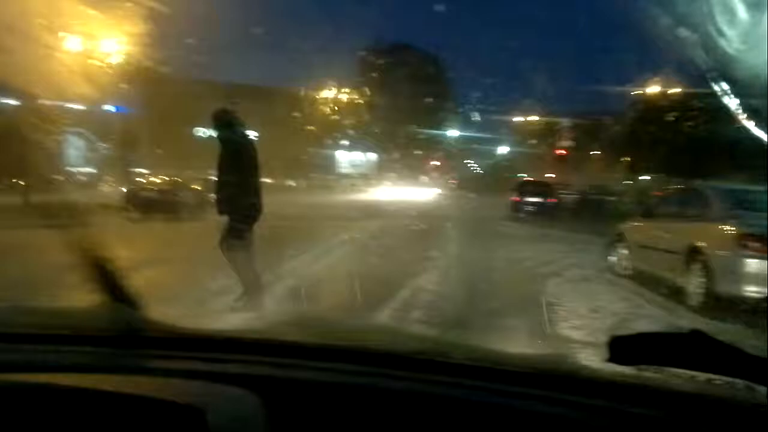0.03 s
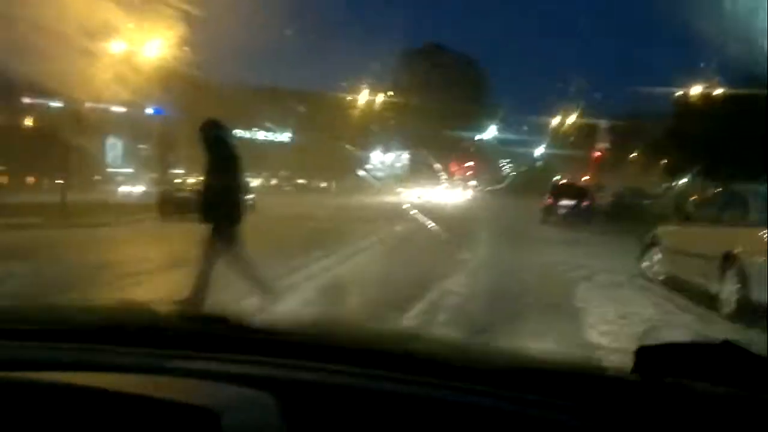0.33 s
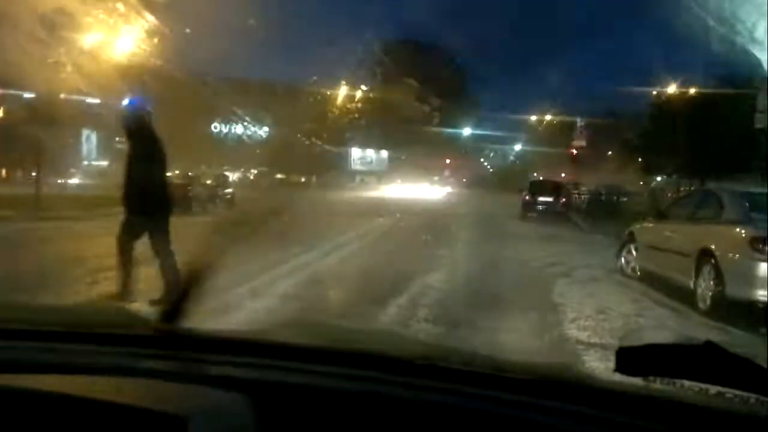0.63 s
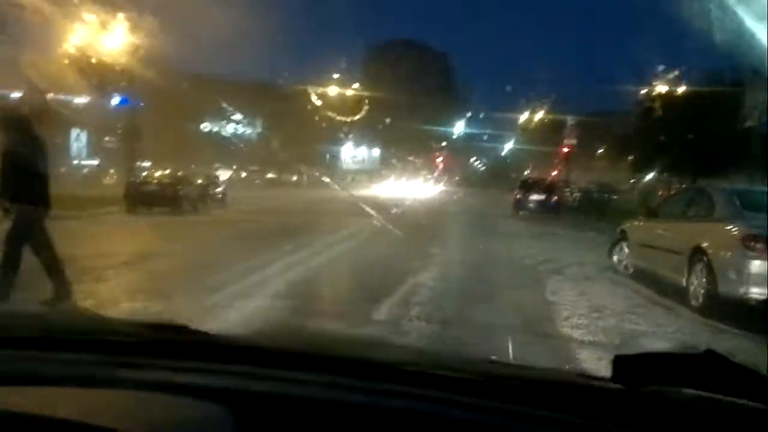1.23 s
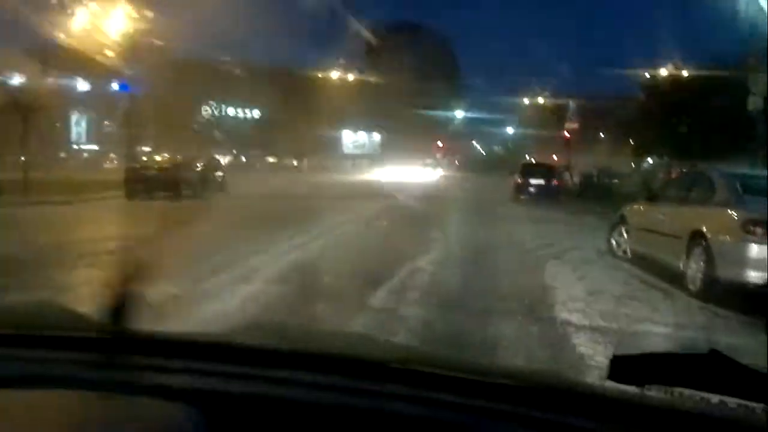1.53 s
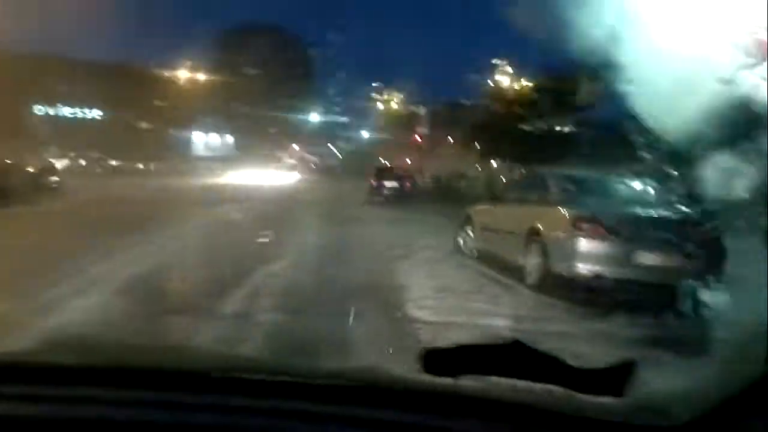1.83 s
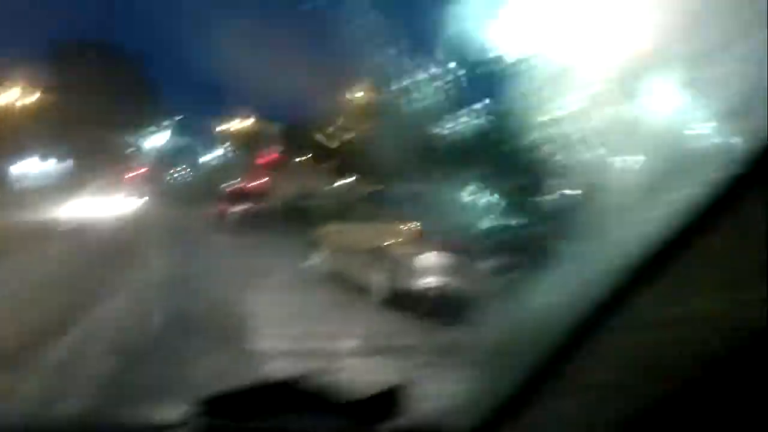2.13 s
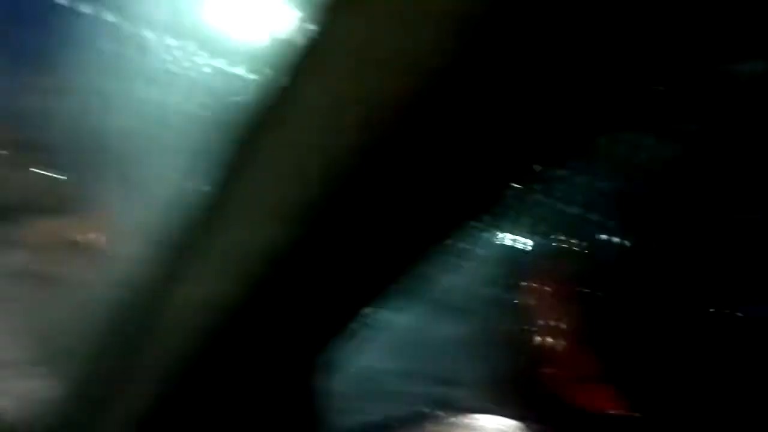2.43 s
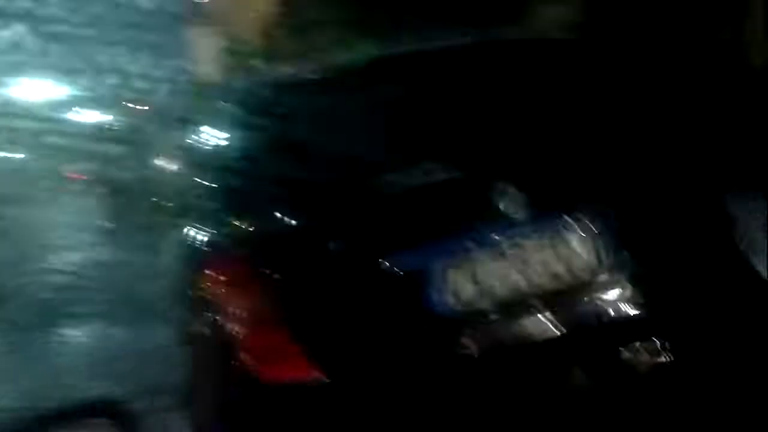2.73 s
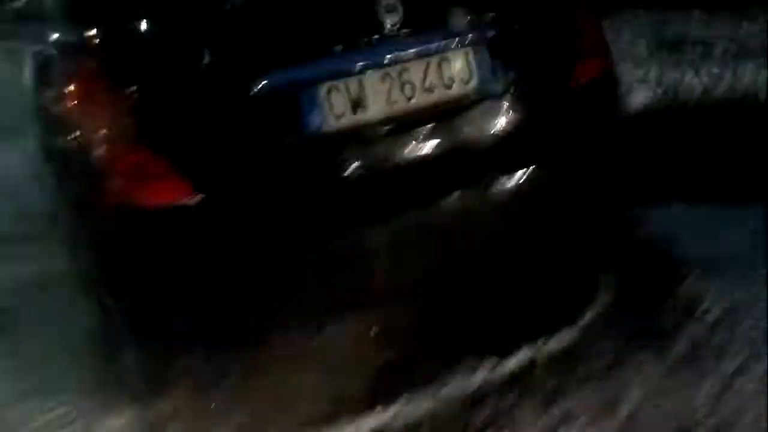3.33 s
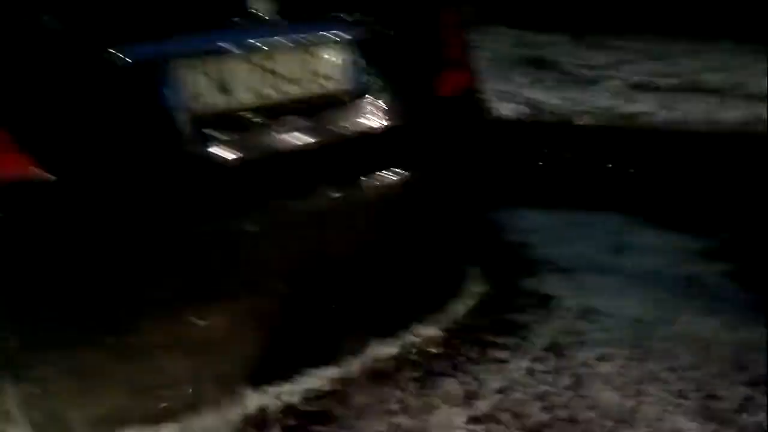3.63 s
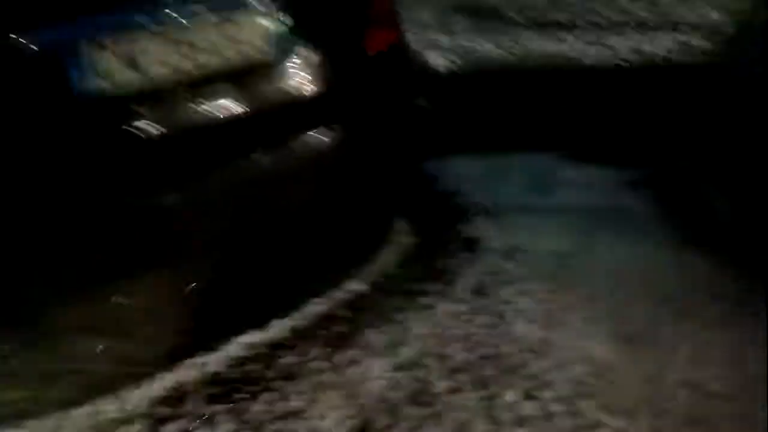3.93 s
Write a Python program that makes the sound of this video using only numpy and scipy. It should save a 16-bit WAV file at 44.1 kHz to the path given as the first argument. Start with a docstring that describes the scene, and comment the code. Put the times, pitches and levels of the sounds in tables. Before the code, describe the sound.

Hail drums on a car roof and cracks on the glass, heard from inside.

```python
"""In the front seat of a car, with hail coming down while the engine idles.
Countless small stones drum on the lined roof and patter on the windows, over a wash of street noise.
Big ones thud on the sheet metal or crack on the glass. The wipers thump at the end of their sweep.
The tone shifts as the listener turns to the side window, and a limiter ducks after the hardest blows."""
import sys
import numpy as np
from scipy import signal
from scipy.fft import rfft, irfft
from scipy.io import wavfile
from scipy.ndimage import uniform_filter1d

SR = 44100
rng = np.random.default_rng(int(sys.argv[2]) if len(sys.argv) > 2 else 0)


def wav_out(sig):
    """Save sig, one row per channel (or a flat mono array), as 16-bit PCM at SR to the path in sys.argv[1]."""
    wavfile.write(sys.argv[1], SR, np.round(np.clip(np.atleast_2d(sig).T, -1, 1) * 32767).astype(np.int16))


N = 176400  # 4 seconds
BLOW_SAMPLES = 12000

# Big stones on the roof: start_s, level_db, hardness_db (more means an icier crack)
ROOF_HITS = [(0.288, -1, -24), (0.355, -7.5, -7), (0.473, -11.5, -1), (0.589, -13.5, -1),
             (0.674, -20.5, 5.5), (0.982, -9.5, -24), (1.016, -7.5, -52), (1.117, -8.5, -27.5),
             (1.136, -19.5, 4.5), (1.315, -11.5, -41), (1.648, -8.5, -24), (1.706, -9.5, -9.5),
             (1.929, -9.5, -2.5), (2.229, -9.5, -13), (2.322, -7.5, -69), (2.606, -20, 3),
             (2.704, -9.5, -50), (2.77, -14.5, -3.5), (2.858, -8.5, -9), (3.04, -9, -48), (3.084, -13, -14),
             (3.358, -9.5, -3.5), (3.38, -6.5, -47), (3.595, -11.5, -40), (3.724, -12, -3.5),
             (3.942, -8.5, -59), (3.987, -14.5, -0.5)]
# Big stones on the glass, and at 2.12 s a soft knock with a small tick: start_s, level_db, sharpness_db,
# pitch_hz
GLASS_HITS = [(0.386,-3,-15,3400), (.4661,-1.5,-11.5,3030), (1.0136,-12.5,-15,3380), (1.0489,0,-20,3010),
              (1.138,-14,-9,5700), (1.8284,-10,-24,2990), (1.8747,-15,-13,3800), (1.964,-2.5,-21,3200),
              (2.12,-12.5,-25,3220), (2.1872,-1.5,-12.5,3400), (2.3025,-12.5,-35,3200),
              (2.4887,-8,-21,3300), (2.575,-11,-30,3270), (2.9145,-13,-16,2750), (3.0825,-15,-6,3260),
              (3.2483,-11,-22,3270), (3.3265,-11,-20,3000), (3.5353,-9,-27,3620), (3.7557,-11,-8,3740),
              (3.924,-14,-12,3370)]
# Wiper thumps: start_s, level_db, pitch_hz
WIPER_THUMPS = [(0.861, -12.5, 65.6), (1.019, -6, 154)]
# Engine tones and cabin booms: pitch_hz, level_db, wander (0 to 1)
ENGINE_TONES = [(25.8, -29, 0), (61.33, -29.5, 0.34), (108.6, -27, 0.59)]

# How strong each sound is from bass to treble: frequency_hz, level_db
ROOF_SPECTRUM = [(40, -31), (110, 0), (190, 0.5), (400, -3.5), (800, -10.5), (1700, -17), (2500, -17.5),
                 (3500, -18), (16000, -67)]
KNOCK_SPECTRUM = [(200, 0.5), (700, -0.5), (2300, -9.5), (3600, -15.5), (12000, -48)]
ICE_SPECTRUM = [(800, -43), (2000, 2), (3500, 7.5), (4900, -2), (6300, 1), (8300, -18), (10000, -10),
                (16000, -41)]
GLASS_SPECTRUM = [(900, -19), (2200, -8.5), (2750, -4.5), (3250, 3.5), (3800, -3.5), (6300, -21),
                  (8300, -34.5), (16000, -63)]
CONTACT_SPECTRUM = [(1500, -24), (3200, 4.5), (6800, -3), (16000, -36)]
PATTER_SPECTRUM = [(900, -4), (2400, -10), (3500, -0.5), (4900, -12), (6500, -13.5), (16000, -45.5)]
STREET_SPECTRUM = [(20, 8), (65, 0), (134, 7), (234, -6), (485, -15.5), (1000, -16.5), (2400, -21.5),
                   (3500, -29.5), (6200, -29.5), (8400, -44.5), (16000, -51)]
# How long the roof takes to fade by 60 dB: frequency_hz, ring_s
ROOF_RING_TIMES = [(120, 0.35), (600, 0.3), (3000, 0.13)]
# Pitches the roof favours: pitch_hz, boost_db
ROOF_RESONANCES = [(285, 4.5), (500, 3)]

# How alike left and right sound: frequency_hz, likeness (0 to 1)
STEREO_LIKENESS = [(100, 1), (600, 0.94), (1400, 0.53), (3000, 0.36)]
# Which side is louder: frequency_hz, left_minus_right_db
STEREO_BALANCE = [(150, -6.5), (400, -5.5), (800, -3.5), (1400, -2), (3000, -10.5), (5500, 0), (9000, -9)]
# How far the left wave runs ahead of the right: frequency_hz, lead_radians
STEREO_LEAD = [(950, 0), (2300, -2.5), (3600, -6.5), (6000, -1.5)]
# The glass moves to the right as the listener turns: time_s, left_minus_right_db
GLASS_POSITION = [(.4, 9), (3.5, -3)]
# Roughly where the midrange dips beside the side window: time_s, frequency_hz
WINDOW_DIP = [(2.42, 770), (2.95, 1356)]


def roof_drumming(level_db=-20.5):
    """Small stones drum on the roof, each making it ring."""
    return amp(level_db) * shower(ROOF_SPECTRUM, ROOF_RING_TIMES, rise_s=0.00018,
                                  per_s=260, spread_db=2.5, spots=28)


def roof_thuds(thud_db=-6, knock_db=-4, ice_db=-5, knock_share=0.22, bounce_db=-6):
    """A big stone makes the sheet metal boom, knocks and cracks on it, then lands a second time."""
    out = np.zeros((2, N))
    for start_s, level_db, hardness_db in ROOF_HITS:
        boom = panel_blow(ROOF_SPECTRUM, ROOF_RING_TIMES, rise_s=0.0062)
        add(out, start_s, amp(level_db + thud_db) * boom)
        bounce_s = 0.012 * (1 + rng.random())
        for delay_s, drop_db in [(0, 0), (bounce_s, bounce_db)]:
            knock = panel_blow(KNOCK_SPECTRUM, ring_s=0.093, rise_s=0.00032)
            knock *= amp(knock_db + knock_share * hardness_db)
            ice = amp(ice_db + hardness_db) * panel_blow(ICE_SPECTRUM, ring_s=0.055, rise_s=0.001)
            add(out, start_s + delay_s, amp(level_db + drop_db) * (knock + ice))
    return out


def roof(narrowness=24):
    """Every blow on the roof is boosted at the same few pitches."""
    blows = roof_drumming() + roof_thuds()
    return blows + sum((amp(db) - 1) * signal.lfilter(*signal.iirpeak(hz, narrowness, fs=SR), blows)
                       for hz, db in ROOF_RESONANCES)


def glass_cracks(ring_db=-4, contact_db=-2, spray_db=1, contact_s=0.00021, spectrum_peak_hz=3250):
    """A sharp contact, a brief ring whose pitch depends on the spot struck, and a thin spray of ice."""
    out, t = np.zeros((2, N)), np.arange(BLOW_SAMPLES) / SR
    for start_s, level_db, sharpness_db, pitch_hz in GLASS_HITS:
        spot_spectrum = np.array(GLASS_SPECTRUM) * [pitch_hz / spectrum_peak_hz, 1]
        ring = amp(ring_db) * panel_blow(spot_spectrum, ring_s=0.034, rise_s=0.00061)
        noise = irfft(cabin_noise_spectrum(CONTACT_SPECTRUM, BLOW_SAMPLES))
        contact = amp(contact_db) * unit_peak(noise * np.exp(-t / contact_s))
        spray = amp(spray_db) * panel_blow(CONTACT_SPECTRUM, ring_s=0.05, rise_s=0.001)
        crack = ring + amp(sharpness_db) * (contact + spray)
        side_db = np.interp(start_s, *np.transpose(GLASS_POSITION))
        add(out, start_s, amp(level_db) * pan(side_db) * crack)
    return out


def window_patter(level_db=-32, flurry_db=2.5):
    """Small stones tick on the windows, louder and softer in quick flurries."""
    ticks = shower(PATTER_SPECTRUM, ring_s=0.05, rise_s=0.00012, per_s=250, spread_db=5.9, spots=24)
    flurries = unit_level(amp(flurry_db * drift(rate_hz=10)))
    return amp(level_db) * ticks * flurries


def wipers(rise_s=0.021):
    """Soft low thumps as the blades turn round."""
    out, t = np.zeros((2, N)), np.arange(BLOW_SAMPLES) / SR
    swell = (t / rise_s * np.exp(1 - t / rise_s)) ** 2
    for start_s, level_db, pitch_hz in WIPER_THUMPS:
        add(out, start_s, pan(-6.5) * amp(level_db) * swell * np.sin(2 * np.pi * pitch_hz * t))
    return out


def engine():
    """The steady firing tone of the idling engine and the wavering booms of the cabin."""
    t, hum = np.arange(N) / SR, 0
    for pitch_hz, level_db, wander in ENGINE_TONES:
        waver = 1 - wander + wander * (drift(rate_hz=10) + 1j * drift(rate_hz=1))
        tone = (waver * np.exp(2j * np.pi * pitch_hz * t)).real
        hum += amp(level_db) * unit_level(tone)
    return pan(-5.5) * hum


def street_wash(level_db=-21):
    """Hail out in the street blurs into a steady, deep noise."""
    return amp(level_db) * unit_level(irfft(cabin_noise_spectrum(STREET_SPECTRUM, N)))


def turn_to_window(sound, turn_s=2.24, dip_db=4.5, fade_db_per_s=3, boom_hz=100, boom_width_hz=45):
    """Near the side window the boom weakens and a reflection sweeps a dip through the midrange."""
    hz, t, slices = signal.stft(sound, SR, nperseg=1024)
    hz, since_s = hz[:, None], np.maximum(t - turn_s, 0)
    ratio = hz / np.interp(t, *np.transpose(WINDOW_DIP))
    near_dip = np.exp(-((ratio - 0.9) / 0.23) ** 2)
    ripple_db = dip_db * np.minimum(10 * since_s, 1) * np.cos(3 * np.pi * ratio) * near_dip
    boom_db = -fade_db_per_s * since_s * np.exp(-((hz - boom_hz) / boom_width_hz) ** 2)
    return signal.istft(slices * amp(ripple_db + boom_db), SR)[1][:, :N]


def shower(spectrum, ring_s, rise_s, per_s, spread_db, spots):
    """Stones of random size land at random times on several spots, each with its own ring."""
    out = np.zeros((2, N))
    for _ in range(spots):
        sizes = amp(spread_db * np.minimum(rng.exponential(1, N), 3))
        stones = sizes * (rng.random(N) < per_s / spots / SR)
        out += signal.oaconvolve(stones[None], panel_blow(spectrum, ring_s, rise_s), axes=1)[:, :N]
    return unit_level(out)


def panel_blow(spectrum, ring_s, rise_s):
    """A struck panel rings at many pitches: each octave swells, then fades by 60 dB in ring_s."""
    noise = cabin_noise_spectrum(spectrum, BLOW_SAMPLES)
    hz = np.fft.rfftfreq(BLOW_SAMPLES, 1 / SR)
    t, out = np.arange(BLOW_SAMPLES) / SR, 0
    octaves_hz = np.geomspace(100, 12800, 8)
    for centre_hz, this_octave in zip(octaves_hz, np.eye(8)):
        band = irfft(noise * look_up(np.c_[octaves_hz, this_octave], hz))
        swell = 1 - np.exp(-t / (rise_s + 1 / centre_hz))
        fade = amp(-60 * t / look_up(ring_s, centre_hz))
        out += band * swell * fade
    return unit_peak(out)


def cabin_noise_spectrum(spectrum, samples):
    """Noise that fills the cabin, partly alike left and right; irfft turns it into sound."""
    hz = np.fft.rfftfreq(samples, 1 / SR)
    shared, separate = rng.standard_normal((2, len(hz))) + 1j * rng.standard_normal((2, len(hz)))
    likeness = look_up(STEREO_LIKENESS, hz)
    left = shared * np.exp(1j * look_up(STEREO_LEAD, hz))
    right = likeness * shared + np.sqrt(1 - likeness ** 2) * separate
    return np.array([left, right]) * amp(look_up(spectrum, hz)) * pan(look_up(STEREO_BALANCE, hz))


def drift(rate_hz):
    """A slow random wobble."""
    hz = np.fft.rfftfreq(N, 1 / SR)
    return unit_level(irfft(rfft(rng.standard_normal(N)) * np.exp(-(hz / rate_hz) ** 2)))


def amp(db):
    """Turns decibels into a multiplier."""
    return 10 ** (np.asarray(db) / 20)


def unit_level(sound):
    """Scales a sound to an average power of 1."""
    return sound / np.sqrt(np.mean(sound ** 2) + 1e-20)


def unit_peak(blow):
    """Scales a blow so that its loudest 3 ms have a power of 1."""
    return blow / np.sqrt(uniform_filter1d((blow ** 2).mean(0), size=132).max())


def look_up(table, hz):
    """Reads between a table's rows by pitch; a single number holds everywhere."""
    if np.isscalar(table):
        return table
    row_hz, values = np.transpose(table)
    return np.interp(np.log(hz + 1), np.log(row_hz), values)


def pan(side_db):
    """Left and right multipliers; a positive side_db makes the left louder."""
    gains = amp(np.vstack([side_db, -side_db]) / 2)
    return gains / np.sqrt((gains ** 2).mean(0))


def add(mix, start_s, sound):
    """Mixes a stereo sound in at start_s."""
    part = mix[:, round(start_s * SR):][:, :sound.shape[1]]
    part += sound[:, :part.shape[1]]


def scene():
    """Everything heard inside the car."""
    hail = roof() + window_patter() + street_wash() + glass_cracks()
    return turn_to_window(hail + wipers() + engine())


def record(dry, start_s=0.2734, limit_db=-11, recover_db_per_s=90, squeeze=0.44, top_hz=16100):
    """The sound cuts in, a limiter turns down loud blows, peaks clip and the highest treble is cut."""
    t = np.arange(N) / SR
    dry = dry * np.clip((t - start_s) / 0.0048, 0, 1)
    power_db = 10 * np.log10(abs(uniform_filter1d((dry ** 2).mean(0), size=130)) + 1e-12)
    recovery_db = t * recover_db_per_s
    held_db = np.maximum.accumulate(power_db + recovery_db) - recovery_db  # jumps up, sinks slowly
    over_db = np.maximum(held_db - limit_db, 0)
    duck_db = squeeze * signal.lfilter([.01], [1, -.99], over_db)  # smoothed over about 2 ms
    clipped = np.clip(dry / amp(duck_db), -1, 1)
    treble_cut = signal.firwin(511, top_hz, window=("kaiser", 9), fs=SR)
    return signal.oaconvolve(clipped, treble_cut[None], "same")


dry = scene()
out = record(dry)
wav_out(out)
```